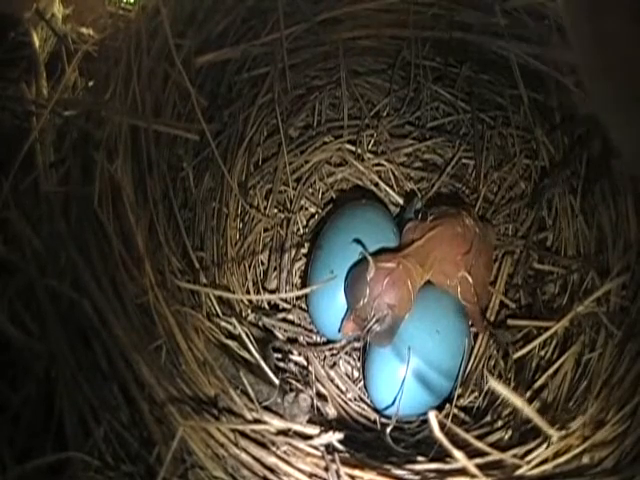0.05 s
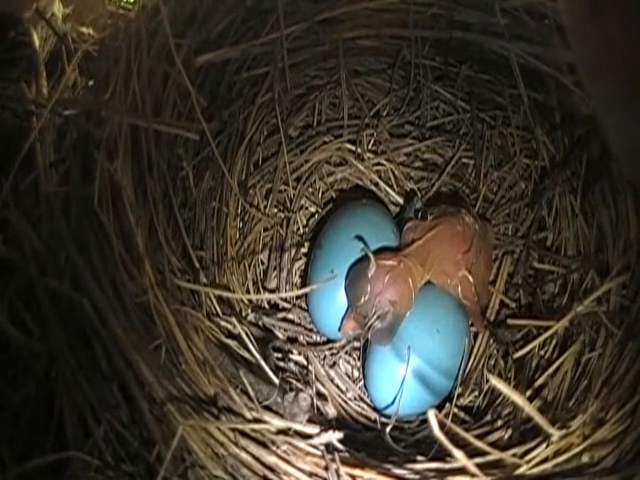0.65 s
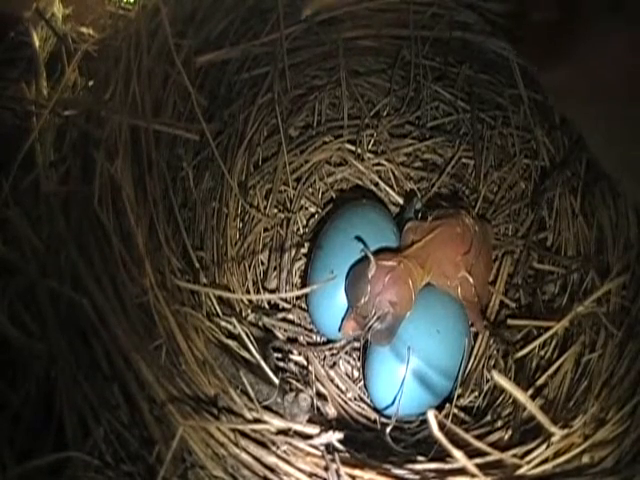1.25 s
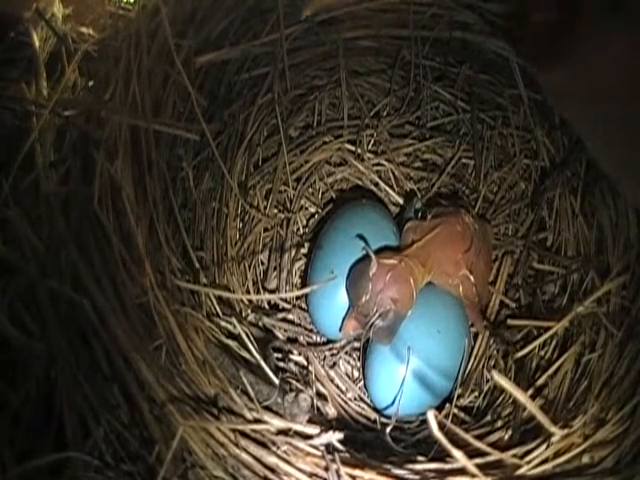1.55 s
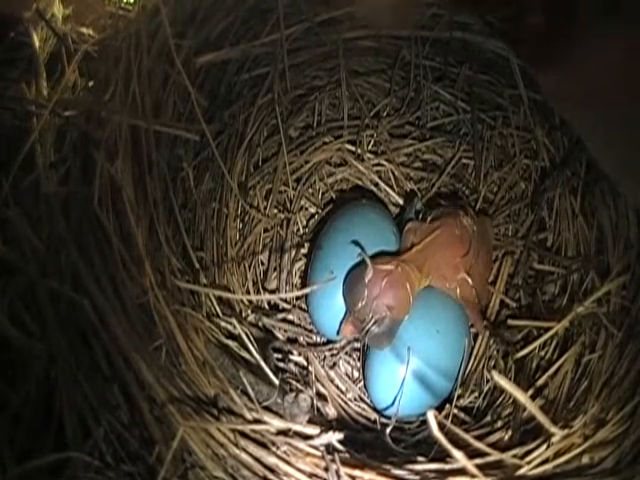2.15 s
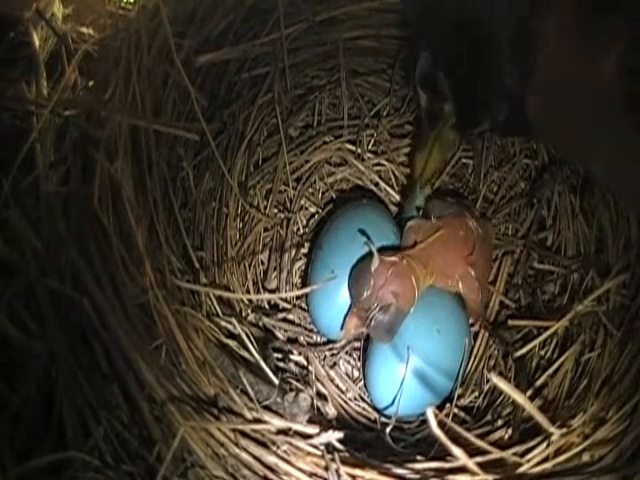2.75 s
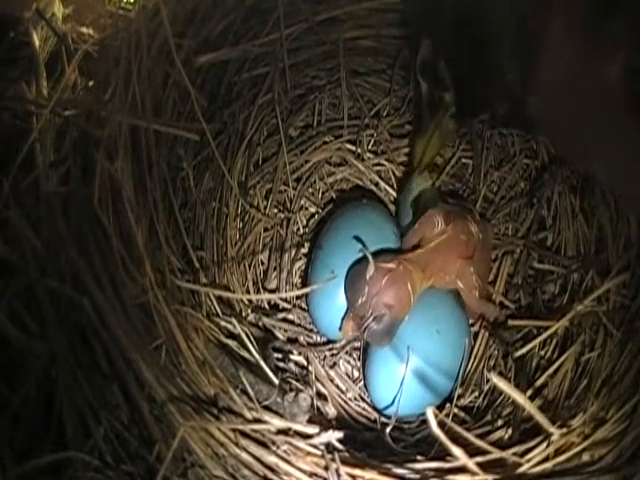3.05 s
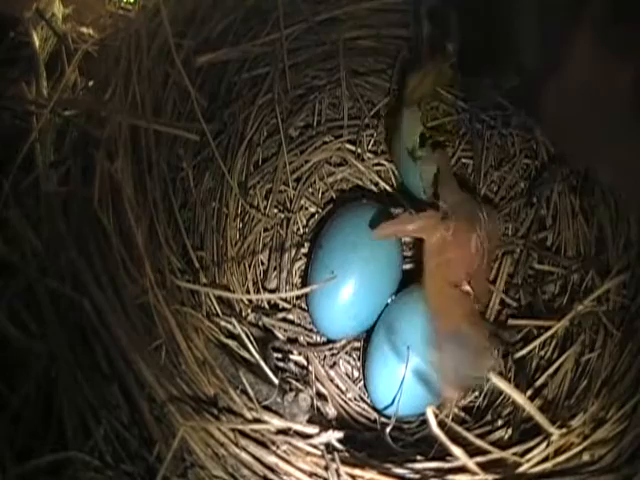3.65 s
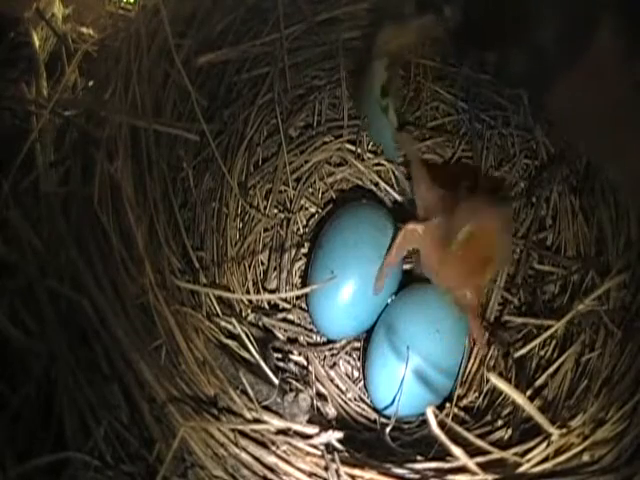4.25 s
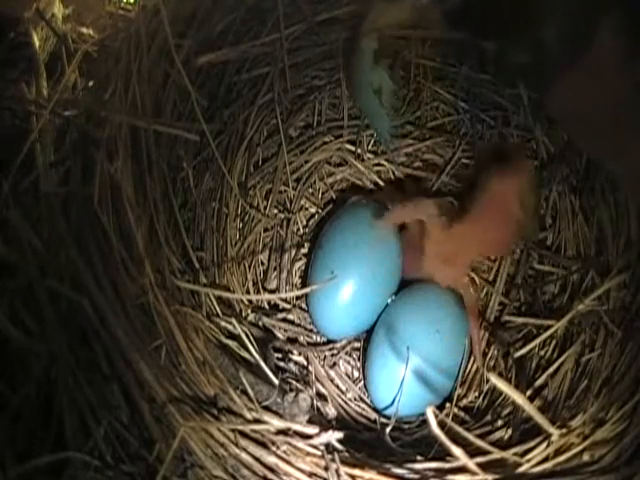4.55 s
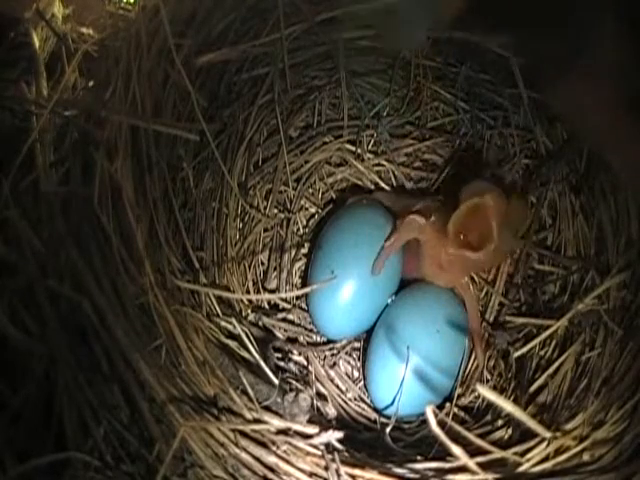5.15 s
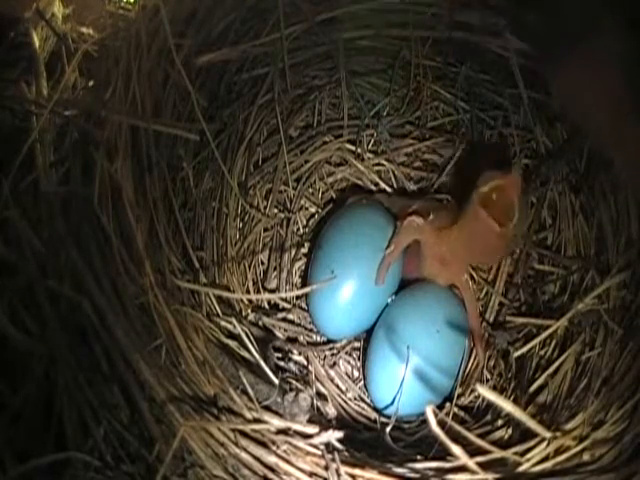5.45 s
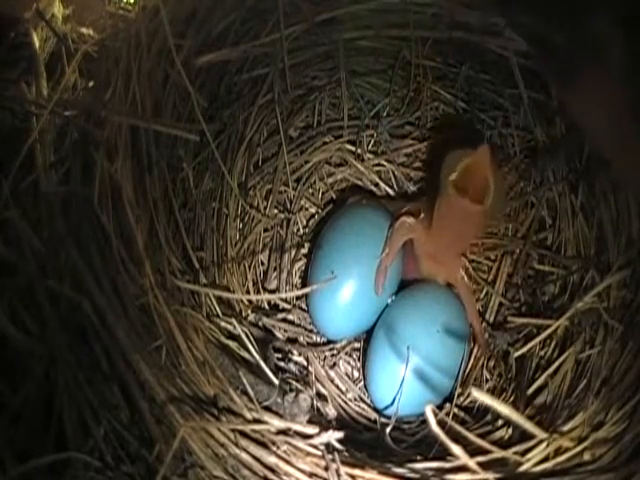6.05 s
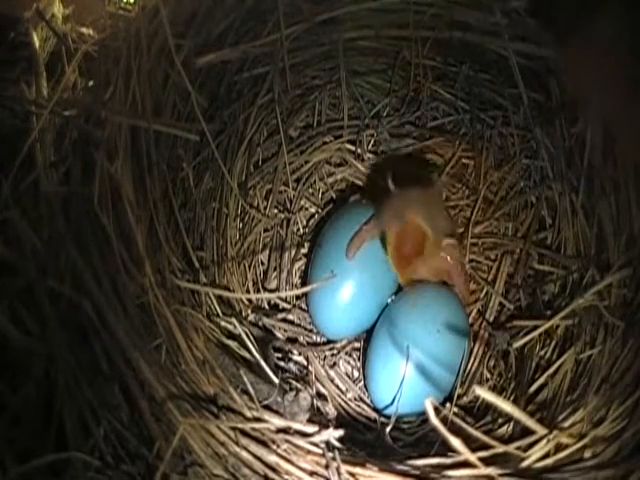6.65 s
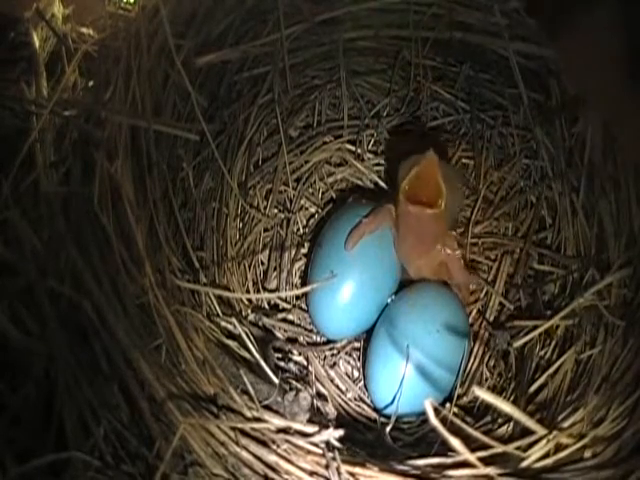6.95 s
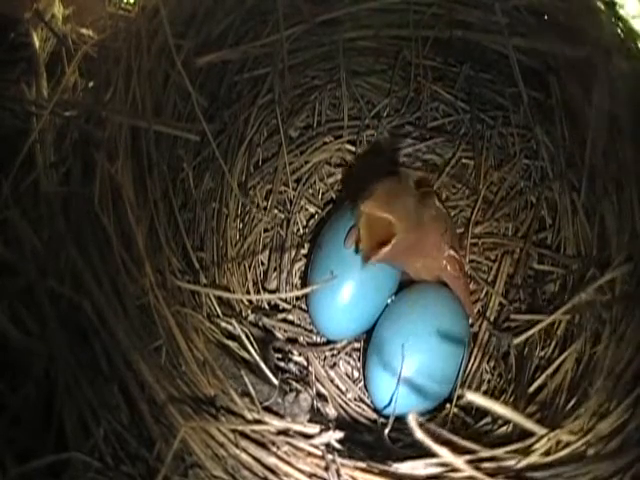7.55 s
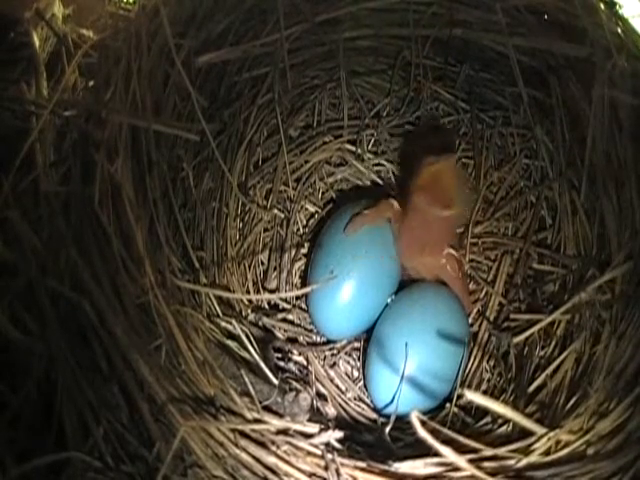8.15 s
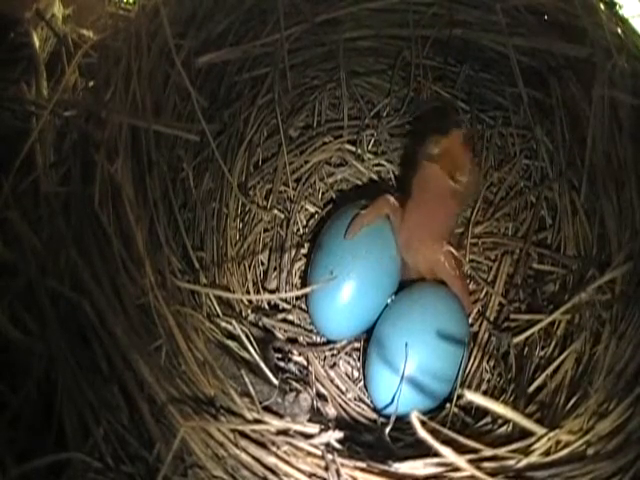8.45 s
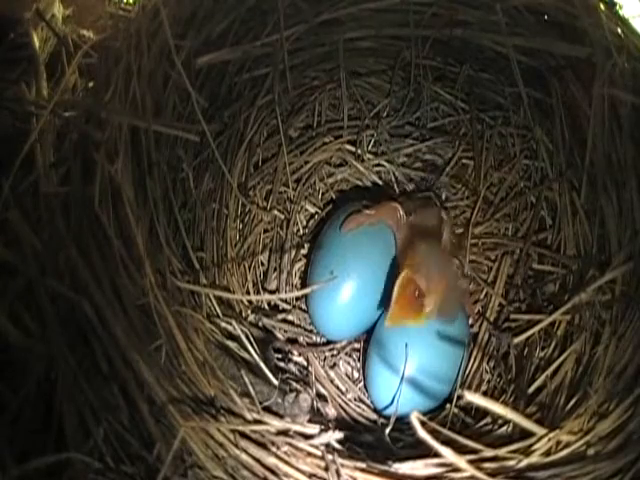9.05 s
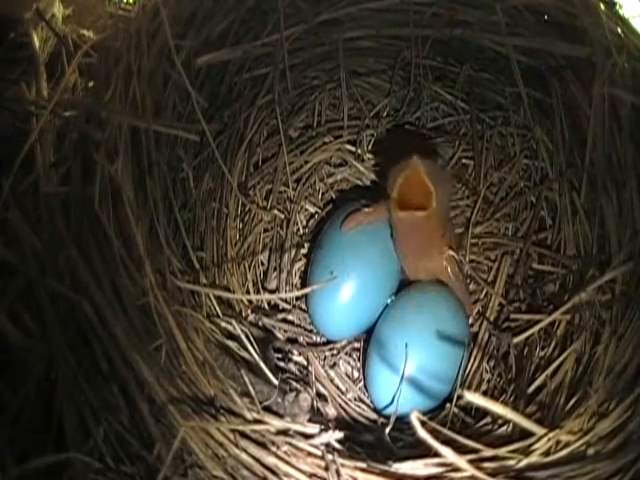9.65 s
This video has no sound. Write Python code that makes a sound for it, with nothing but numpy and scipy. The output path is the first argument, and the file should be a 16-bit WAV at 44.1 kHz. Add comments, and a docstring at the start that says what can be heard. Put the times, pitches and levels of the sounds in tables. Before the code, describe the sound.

A bird's claws crackle over nest straw between low thuds in quiet outdoor air, then it flutters away with a few quick wingbeats.

```python
"""A small stereo camera sits in a straw nest, in quiet outdoor air. Dull thuds roll in at the start,
after 3 s and near the end. The parent bird shifts, and just after 2 s the chick peeps once.
From about 5 s claws snap and scrape the dry stems right beside the microphone, and the hiss grows
as the nest is uncovered. Near 7.5 s the bird leaves with a few quick wingbeats; after the last thud
a faint wavering tone and two ticks are heard."""
import sys
import numpy as np
from scipy import signal
from scipy.fft import rfft, irfft, next_fast_len
from scipy.io import wavfile
from scipy.ndimage import map_coordinates

SR = 44100
rng = np.random.default_rng(int(sys.argv[2]) if len(sys.argv) > 2 else 0)


def wav_record(signal):
    """Record a signal, one row per channel, as 16-bit PCM in the file named by sys.argv[1]."""
    frames = np.transpose(np.atleast_2d(signal))
    bounded = np.clip(frames, -1, 1)
    # unit amplitude maps onto the largest positive 16-bit level
    quanta = np.round(bounded * 32767).astype(np.int16)
    wavfile.write(sys.argv[1], SR, quanta)


N = 436942

# Stems snapping under the claws. Each row: start in seconds, crack level in dB, knock level in dB,
# crack centre in Hz, seconds the stem goes on tearing.
SNAPS = [(2.1308, -42, -53, 8300, .001), (2.618, -48, -62, 6900, .001), (4.877, -43, -72, 8600, .001),
         (4.9286, -19.5, -35.5, 8500, .0025), (4.9335, -25, -60, 8600, .005),
         (4.9813, -33.5, -58, 10200, .001), (4.9885, -25, -51, 11000, .005),
         (5.1124, -38.5, -70, 10500, .001), (5.125, -44, -48, 9150, .001), (5.186, -24, -39, 8300, .005),
         (5.1974, -31, -45, 8200, .009), (5.2445, -39.5, -58, 8900, .015), (5.2685, -32, -60, 10200, .008),
         (5.2902, -38, -72, 9500, .001), (5.5785, -26, -50, 8900, .011), (5.603, -33, -48, 8600, .01),
         (5.625, -40.5, -61, 9300, .016), (5.759, -22.5, -51, 9200, .003),
         (5.7708, -36.5, -42.5, 9200, .017), (5.8803, -36.5, -45, 8500, .017),
         (5.9088, -38.5, -68, 9500, .001), (6.0315, -36.5, -61, 10700, .001),
         (6.0454, -30, -45, 8100, .008), (6.1102, -28, -64, 10200, .001), (6.1795, -30, -41.5, 9000, .001),
         (6.4411, -39, -50, 9100, .008), (6.5984, -36, -44, 9300, .002), (6.7776, -40, -62, 9600, .001),
         (6.7838, -34, -47.5, 8200, .002), (6.8478, -38, -48, 9600, .001), (6.9324, -42, -57, 8400, .001),
         (6.94, -38, -43, 8700, .002), (7.1191, -37, -47, 8600, .004), (7.4234, -30, -35.5, 8900, .001),
         (8.4301, -47.5, -53, 10200, .001)]


def stem_snaps(scatter_t60=.015, tail_t60=.095, knock_t60=.016, stem_spread_db=2.5):
    """Stems snap beside the microphone: a spike, its dense scatter in the nest cup, a woody knock."""
    # Colour of the knock. Each row: frequency in Hz, gain in dB.
    knock_spectrum = [(100, -15.5), (600, -15), (900, -5), (1150, 4.5), (1650, 0.5), (2100, -7), (4000, -7),
                      (12000, -43)]
    out, lead = np.zeros((2, N)), SR // 200
    t = np.arange(-lead, SR // 12) / SR
    unit_attack = lambda x: x / np.sqrt(np.mean(x[:, lead:lead + SR // 500] ** 2))  # rms 1 over 2 ms
    fade = lambda t60: amp(-60 * abs(t) / t60)
    lead_in = amp(-21) * fade(.0081)  # a faint, brief swell of noise just before the crack
    scatter = amp(-16) * fade(scatter_t60) + amp(-39) * fade(tail_t60)
    for start, crack_db, knock_db, centre_hz in stem_breaks():
        blow = np.where(t < 0, lead_in, scatter) * pair(.23, len(t))
        blow[:, lead] += 1
        # a second tiny spike, different at each microphone, widens the crack
        blow[[0, 1], lead + rng.integers(10, 28, 2)] += rng.normal(0, .85, 2)
        bumps_db = rng.normal(0, stem_spread_db, size=28)  # every stem has its own peaks and dips
        own_colour = lambda hz: amp(np.interp(hz, np.linspace(0, SR / 2, len(bumps_db)), bumps_db))
        crack = coloured(blow, lambda hz: straw(centre_hz, broad=.35)(hz) * own_colour(hz))
        brighten = amp(.19 * (knock_db + 47))  # harder knocks are brighter
        impact = (t >= 0) * fade(knock_t60) * pair(1, len(t)) + 3 * (t == 0)
        knock = coloured(impact, lambda hz: shape(knock_spectrum)(hz / brighten))
        add(out, start + t[0], amp(crack_db) * unit_attack(crack) + amp(knock_db) * unit_attack(knock))
    return out


def stem_breaks(splinters=2, clean_break_s=.004):
    """Each stem snaps, then splinters more softly as it tears; a clean, fast break hardly splinters."""
    rows, k = [], np.arange(splinters)
    for start, crack_db, knock_db, centre_hz, tear_s in SNAPS:
        delays = tear_s * (k + 1 + rng.uniform(-.3, .3, splinters)) / splinters
        splinter_db = -7.5 - 3.5 * k + 20 * np.log10(min(tear_s / clean_break_s, 1))
        for delay, drop_db in [(0, 0), *zip(delays, rng.normal(splinter_db, 1))]:
            rows.append((start + delay, crack_db + drop_db, knock_db + drop_db, centre_hz))
    return rows


def straw(centre_hz, broad):
    """Colour of dry straw: a broad crack, the stem's own pitch and resonances shared with neighbours."""
    # Stems pressed against the camera. Each row: resonance in Hz, Q, level in dB.
    stem_modes = [(5020, 50, -2), (6600, 81, -4), (7480, 22, 1.5), (8400, 100, -11), (8630, 120, -2),
                  (9680, 66, -2), (10070, 70, -4)]
    # Colour of the broad crack. Each row: frequency in Hz, gain in dB.
    crack_spectrum = [(200, -43), (900, -1.5), (2000, 0), (4000, -3), (6000, -1.2), (8000, -2.5),
                      (10500, 0.5), (12500, -4), (15000, -12), (16500, -11)]

    def gain(hz):
        shared = 1 + sum(amp(db) * resonance(mode_hz, q)(hz) ** 2 for mode_hz, q, db in stem_modes)
        tilt = (hz / 8000 + .05) ** (2.9 * np.log(centre_hz / 8700))  # thinner stems are brighter
        own_pitch = broad + resonance(centre_hz, q=3.5)(hz) ** .94
        return shape(crack_spectrum)(hz) * tilt * shared * own_pitch
    return gain


def straw_scrapes(strain_s=.004):
    """Feathers and feet drag over the straw, straining stems rub, and the weave crinkles in between."""
    # Dragging strokes. Each row: middle in seconds, level in dB, half length in seconds,
    # centre in Hz, share of broad hiss from 0 to 1.
    drags = [(.045, -59, .014, 10800, .6), (.916, -61, .012, 9000, .4), (2.314, -62.5, .015, 11000, .4),
             (2.632, -55.5, .018, 7500, .2), (3.701, -57.5, .033, 7300, .4), (5.69, -54, .014, 10400, .05),
             (5.967, -48.5, .012, 10100, .15), (6.287, -47.5, .023, 8400, .9), (6.378, -50, .02, 9900, .02),
             (6.545, -57.5, .025, 10300, .02), (7.462, -44, .028, 8100, .9), (7.53, -50, .12, 9000, .9)]
    # Settling straw. Each row: time in seconds, level in dB.
    settling = [(0, -83), (4.75, -78), (5.42, -76), (5.58, -60.5), (6.12, -60), (6.6, -67.5), (8.1, -68),
                (8.5, -82)]
    crinkle_db = level_curve(settling) + 2.5 * wobble(40)
    out = amp(crinkle_db) * fibre_slips(straw(9600, broad=.75), per_s=220, spread_db=10, size=N)
    rubs = [(start + tear_s / 2, db - 20, strain_s + tear_s / 2, 8700, .25)  # laid out like drags
            for start, db, *_, tear_s in SNAPS]
    t = np.arange(-SR // 3, SR // 3) / SR
    for middle, db, half_s, centre_hz, broad in drags + rubs:
        friction = fibre_slips(straw(centre_hz, broad), per_s=660, spread_db=8, size=len(t))
        add(out, middle + t[0], amp(db) * bell(t, half_s) * friction)
    return out


def fibre_slips(gain, per_s, spread_db, size, decay_s=.0011):
    """Tiny fibre slips of uneven size on a bed of rubbing noise, at rms 1."""
    slips = (rng.random(size) < per_s / SR) * amp(spread_db * rng.random(size))
    grip = signal.lfilter([1], [1, -np.exp(-1 / (decay_s * SR))], slips)
    return unit(coloured(pair(.29, size) * (unit(grip) + .6), gain))


def ticks(t60=.028):
    """Close ticks, each ringing briefly around one pitch."""
    # Each row: start in seconds, level in dB, pitch in Hz.
    taps = [(2.1305, -42.5, 1600), (2.617, -42, 6400), (4.928, -24, 1780), (4.929, -27, 5050),
            (7.822, -46.5, 3580), (7.886, -49, 3700), (9.461, -45, 2100), (9.558, -50.5, 2000)]
    out, t = np.zeros((2, N)), np.arange(SR // 16) / SR
    for start, db, pitch_hz in taps:
        ring = noise(lambda hz: resonance(pitch_hz, q=3.5)(hz) ** 2, .78, len(t))
        add(out, start, amp(db - 60 * t / t60) * ring)
    return out


def wingbeats(swish_lead_s=.0075):
    """On each stroke the feathers swish, then a short push of air reaches the microphone."""
    # Colour of the feathers. Each row: frequency in Hz, gain in dB.
    swish_spectrum = [(200, -3), (700, -1.5), (1450, 4), (2600, -3.5), (6000, -2.5), (10000, 1),
                      (13000, -9.5), (16000, -18)]
    out, t = np.zeros((2, N)), np.arange(-SR // 8, SR // 8) / SR
    for middle, push_db, push_hz, swish_db, half_s in wing_strokes():
        stroke = bell(t, half_s)
        push = unit(stroke * noise(resonance(push_hz, q=2.3), 1, len(t))) * rms(stroke)
        swish_envelope = (1 + ((t + swish_lead_s) / (1.25 * half_s)) ** 2) ** -1.1
        swish = swish_envelope * noise(shape(swish_spectrum), .31, len(t))
        buffet = stroke * noise(resonance(93, q=.96), .43, len(t))
        add(out, middle + t[0], amp(push_db) * (push + amp(-11) * buffet) + amp(swish_db) * swish)
    return out


def wing_strokes(near_db=-39, up_lead_s=.024, up_hz=275):
    """A soft upstroke, then the downstroke; both lengthen and lose swish as the bird draws away."""
    # Beats of the leaving bird. Each row: middle in seconds, air push in dB, push centre in Hz.
    beats = [(7.451, -38.5, 780), (7.533, -39, 470), (7.608, -36.5, 540), (7.673, -39, 640),
             (7.734, -47, 280), (7.8, -54.5, 420), (7.868, -53, 370)]
    rows = []
    for middle, push_db, push_hz in beats:
        away_db = max(near_db - push_db, 0)
        half_s = .0092 + .0005 * away_db
        feathers_db = push_db - .33 * away_db
        rows.append((middle - up_lead_s, push_db - 6.5, up_hz, feathers_db - 11, half_s))
        rows.append((middle, push_db, push_hz, feathers_db + 2, half_s))
    return rows


def chick_peep(start=2.138, length_s=.059, level_db=-46, top_hz=2810):
    """One thin peep in the nest, almost a pure tone, arching in pitch."""
    progress = np.clip((np.arange(N) / SR - start) / length_s, 0, 1)
    pitch_hz = top_hz - 700 * (progress - .38) ** 2
    phase = 2 * np.pi * np.cumsum(pitch_hz * (1 + .003 * wobble(300))) / SR
    harmonics = sum(amp(db) * np.sin(k * phase) for k, db in enumerate([0, -23, -26, -29], 1))
    envelope = abs(np.sin(np.pi * progress)) ** 1.3
    return np.sqrt(2) * amp(level_db) * harmonics * envelope


def thuds(ring_hz=1110, flutter_db=.9, rebound_s=.04):
    """Around the nest, low booms with a hollow ring; a brighter echo swells later, all fade unevenly."""
    # Each row: start in seconds, boom level in dB, boom resonance in Hz, ring level in dB,
    # seconds to fall by 60 dB.
    hits = [(0, -52, 290, -64, 1), (.235, -36.3, 220, -46, .41), (3.131, -60, 273, -75, .25),
            (3.353, -62, 302, -50.5, .16), (3.668, -47.3, 280, -53, .46), (8.47, -37, 178, -50, .55)]
    # Colours of the boom and of its echo. Each row: frequency in Hz, gain in dB.
    boom_spectrum = [(25, -39), (58, -17), (95, 1.5), (170, 0.5), (250, -1), (340, 0.5), (450, -10.5),
                     (800, -14), (2000, -27), (8000, -62)]
    echo_spectrum = [(150, -13), (400, -9), (650, 3.5), (900, -7.5), (1500, -6.5), (2200, -12), (4000, -18),
                     (9000, -28), (16000, -52)]
    out, t = np.zeros((2, N)), np.arange(SR * 3 // 4) / SR

    def burst(gain, t60, alike, rise_s):
        envelope = np.minimum(t / rise_s, 1) * amp(-60 * np.maximum(t - rise_s, 0) / t60)
        flutter = amp(flutter_db * wobble(51, len(t)))
        return unit(envelope * flutter * noise(gain, alike, len(t))) * rms(envelope)

    for start, boom_db, boom_hz, ring_db, t60 in hits:
        echo_db = (boom_db + ring_db) / 2 - 5.5
        # each thud comes back once, softer and lower
        for delay, drop_db, body_hz in [(0, 0, boom_hz), (rebound_s, -7, .8 * boom_hz)]:
            body = lambda hz: resonance(body_hz, q=.9)(hz) ** ((body_hz / 200) ** 2)
            boom = burst(lambda hz: shape(boom_spectrum)(hz) * body(hz), t60, alike=.97, rise_s=.009)
            ring = burst(lambda hz: resonance(ring_hz, q=7)(hz) ** 2, t60, alike=.93, rise_s=.0056)
            echo = burst(shape(echo_spectrum), t60, alike=.48, rise_s=.04)
            thud = amp(boom_db) * boom + amp(ring_db) * ring + amp(echo_db) * echo
            add(out, start + delay, amp(drop_db) * thud)
    return out


def outdoor_air():
    """Quiet, wide air around the nest, almost steady and a touch louder on the left."""
    # Each row: frequency in Hz, gain in dB.
    air_spectrum = [(15, -51), (25, -29), (84, -23), (108, -14.5), (161, -11.5), (217, -5.5), (384, -3.5),
                    (427, -2.5), (659, -3), (714, -4), (962, -6), (2110, -12), (2690, -13), (8360, -19),
                    (16000, -36.5)]
    return amp(-55 + .36 * wobble(5.5)) * noise(shape(air_spectrum), -.014, N) * balance(left_db=.6)


def microphone_hiss():
    """Hiss that grows as the nest is uncovered, with a faint, steady whine."""
    # Colour of the hiss. Each row: frequency in Hz, gain in dB.
    hiss_spectrum = [(880, -32), (1500, 2.5), (1640, -2.5), (2140, -2), (2770, -1.5), (8570, -5),
                     (14800, -22.5), (16000, -40)]
    # Its rise. Each row: time in seconds, level in dB.
    uncovering = [(0, -77), (4.7, -75), (5.4, -64), (8.1, -59.8)]
    hiss = amp(level_curve(uncovering)) * noise(shape(hiss_spectrum), .48, N)
    whine = amp(-73.5) * noise(resonance(2170, q=43), .3, N)
    return hiss + whine


def wavering_tone():
    """A faint tone of unsteady pitch swells twice near the end."""
    # Each row: middle in seconds, level in dB, half length in seconds.
    swells = [(8.7, -66, .12), (9.4, -64.5, .22)]
    envelope = sum(amp(db) * bell(np.arange(N) / SR - middle, half_s) for middle, db, half_s in swells)
    pitch_hz = 1166 * (1 + .011 * wobble(160))
    return envelope * unit(np.sin(2 * np.pi * np.cumsum(pitch_hz) / SR))


def amp(db):
    """Decibels to gain."""
    return 10 ** (np.asarray(db) / 20)


def rms(x):
    """Root mean square, never quite zero."""
    return np.sqrt(np.mean(x ** 2) + 1e-20)


def unit(x):
    """Scale to rms 1."""
    return x / rms(x)


def balance(left_db):
    """Channel gains that put the left left_db above the right."""
    return amp([[left_db / 2], [-left_db / 2]])


def bell(t, half_s):
    """A Gaussian swell around t = 0."""
    return np.exp(-(t / half_s) ** 2 / 2)


def level_curve(points):
    """One level per sample through (seconds, dB) points."""
    return np.interp(np.arange(N) / SR, *np.transpose(points))


def wobble(rate, size=N):
    """A smooth random curve, rate knots a second."""
    knots = rng.standard_normal(size // 20 + 4)
    return map_coordinates(knots, [np.arange(size) * rate / SR], mode="mirror")


def shape(points):
    """Gain against frequency through (Hz, dB) points."""
    points_hz, db = np.transpose(points)
    return lambda hz: amp(np.interp(np.log(hz + 1), np.log(points_hz), db))


def resonance(centre_hz, q):
    """Gain against frequency of one resonance."""
    return lambda hz: 1 / np.sqrt(1 + (q * ((hz + 1) / centre_hz - centre_hz / (hz + 1))) ** 2)


def coloured(x, gain):
    """Causal (minimum-phase) filter, so that attacks stay sharp."""
    n = x.shape[-1]
    m = 2 * next_fast_len(n // 2 + 1024)
    cepstrum = irfft(np.log(np.maximum(gain(np.fft.rfftfreq(m, 1 / SR)), 1e-6)))
    cepstrum[1:m // 2] *= 2
    cepstrum[m // 2 + 1:] = 0
    return irfft(rfft(x, m) * np.exp(rfft(cepstrum)), m)[..., :n]


def pair(alike, size):
    """White noise at two microphones, with correlation alike."""
    mid, side = rng.standard_normal((2, size))
    turn = np.arccos(np.clip(alike, -1, 1)) / 2
    return np.cos(turn) * mid + np.sin(turn) * np.array([side, -side])


def noise(gain, alike, size):
    """Coloured stereo noise of rms 1."""
    return unit(coloured(pair(alike, size), gain))


def add(out, start, x):
    """Mix x into out from start seconds on."""
    i = round(start * SR)
    x = x[:, max(-i, 0):N - i]
    out[:, max(i, 0):][:, :x.shape[1]] += x


def scene():
    """Birds and straw close by, a little to the right; thuds and air around them."""
    nest = stem_snaps() + straw_scrapes() + ticks() + wingbeats() + chick_peep()
    return balance(left_db=-.8) * nest + thuds() + outdoor_air() + microphone_hiss() + wavering_tone()


def record(dry):
    """The camera's two microphone ports differ most in the deep bass; it cuts off above 16 kHz."""
    # Side gain of the ports. Each row: frequency in Hz, gain in dB.
    side_spectrum = [(40, 4.5), (120, 0.5), (250, -1), (1100, 2.5), (2200, 0), (5000, -4.5), (7800, -2),
                     (10500, -0.5), (15000, 0.5)]
    m = next_fast_len(N + SR // 2)
    hz = np.fft.rfftfreq(m, 1 / SR)
    left, right = rfft(dry, m)
    width = shape(side_spectrum)(hz)
    mid, side = (left + right) / 2, width * (left - right) / 2
    even_level = 1 / np.sqrt(.7 + .3 * width ** 2)
    band_limit = 1 / (1 + (hz / 16000) ** 160)
    return irfft(np.array([mid + side, mid - side]) * even_level * band_limit, m)[:, :N]


dry = scene()
out = record(dry)
wav_record(out)
```